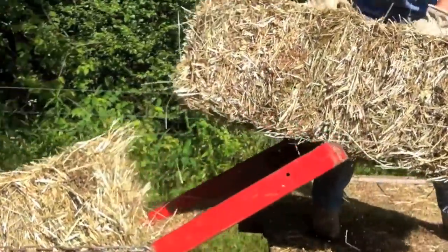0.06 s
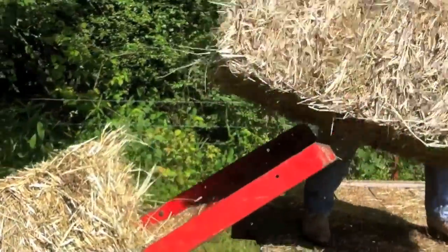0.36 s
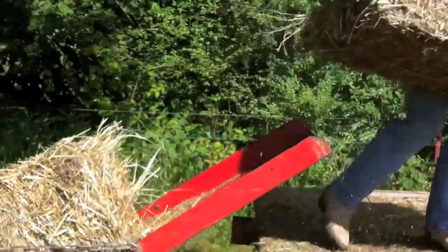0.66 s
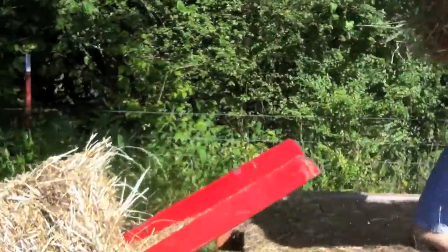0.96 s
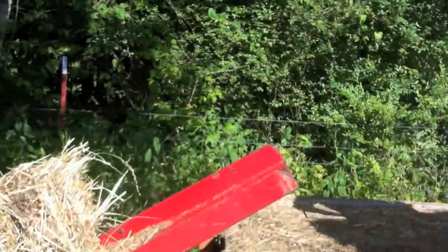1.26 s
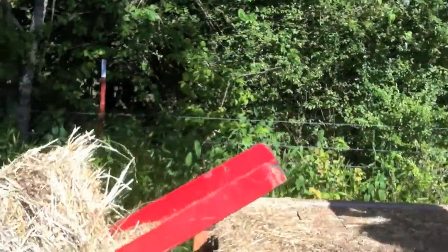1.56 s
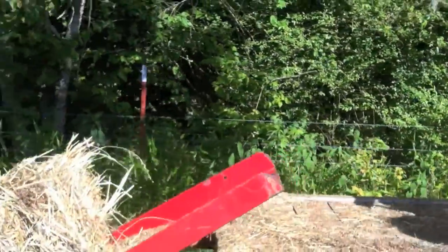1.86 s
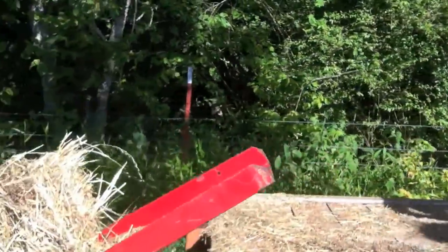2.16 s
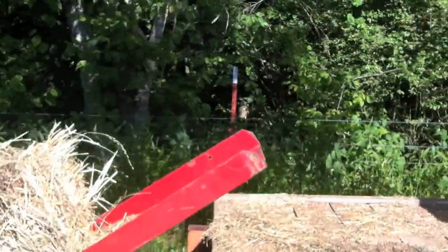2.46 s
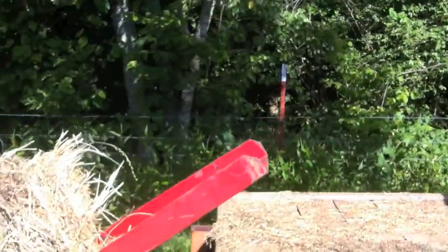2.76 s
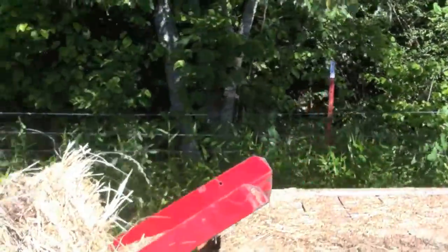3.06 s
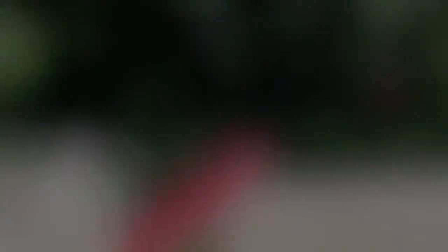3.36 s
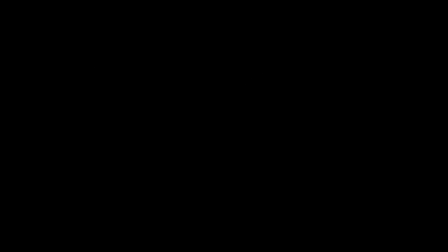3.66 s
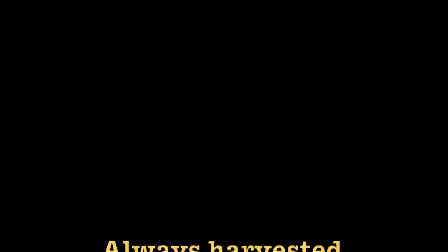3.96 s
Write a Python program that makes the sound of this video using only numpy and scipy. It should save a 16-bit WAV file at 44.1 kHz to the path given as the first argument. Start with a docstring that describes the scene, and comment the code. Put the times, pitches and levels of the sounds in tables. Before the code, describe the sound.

A hay baler rattles close by in an open field, over a tractor's drone. Its plunger crunches into the hay in regular strokes with hard metal clacks and dull wagon thuds, while straw rustles, until everything fades out.

```python
"""Open hay field: a tractor pulls a square baler; one microphone on the wagon, just behind the bale chute.
From the start, chains and sheet metal rattle over the engine's drone while straw rustles in the chute.
At 0.3 s the plunger crunches into the hay with hard clacks, and the wagon deck thuds. Strokes follow about
every 0.65 s, clacking hardest on every second one (1.6 s, 2.9 s); along the way steel squeaks, links clink
and stalks snap. From 3.2 s everything fades, reaching silence at 3.6 s."""
import sys
import numpy as np
from scipy import signal
from scipy.fft import rfft, irfft
from scipy.io import wavfile

SR = 44100
rng = np.random.default_rng(int(sys.argv[2]) if len(sys.argv) > 2 else 0)


def put_to_file(sound):
    """Save the sound as 16-bit audio at rate SR, in the file named by the first command-line argument."""
    columns = np.atleast_2d(sound).T  # one column per channel
    safe = np.clip(columns, -1, 1)
    whole_steps = np.round(safe * 32767)
    wavfile.write(sys.argv[1], SR, whole_steps.astype(np.int16))


N = 176400
T = np.arange(N) / SR


# Surges as the plunger packs hay and it springs back: peak t/s, rise/s, fall/s, clatter/dB, crunch/dB, grind/dB
STROKES = [(.28, 0.015, 0.053, -28.5, -32.5, -33), (.39, 0.01, 0.017, -55, -37.5, -45),
           (.455, 0.04, 0.088, -33.5, -40, -35), (.725, 0.0066, 0.058, -45, -42.5, -33),
           (0.929, 0.017, 0.043, -26.5, -39, -37), (.99, 0.045, 0.083, -28.5, -38.5, -31.5),
           (1.595, 0.015, 0.06, -32, -42, -44), (1.68, 0.017, 0.0091, -29, -36.5, -44),
           (1.775, 0.054, 0.055, -31.5, -35.5, -31.5), (2.265, 0.1, 0.094, -33, -39, -30.5),
           (2.75, 0.063, 0.02, -30.5, -43, -35.5), (2.835, 0.045, 0.037, -28.5, -39, -36.5),
           (2.935, 0.04, 0.04, -32, -36.5, -37.5), (3.068, 0.099, 0.026, -36, -40.5, -36.5)]
def baler():
    """Just ahead of the microphone: a constant rattle; each stroke swells it, crunches hay, grinds steel."""
    clatter_power, crunch_power, grind_power = from_db(-32) ** 2, 0, 0
    for peak, rise, fall, clatter_db, crunch_db, grind_db in STROKES:
        swell = np.exp(-np.where(T < peak, (peak - T) / rise, (T - peak) / fall))
        clatter_power += (from_db(clatter_db) * swell) ** 2
        crunch_power += (from_db(crunch_db) * swell) ** 2
        grind_power += (from_db(grind_db) * swell) ** 2
    flutter = from_db(drift(12))
    metal = rattle(np.sqrt(clatter_power) * flutter) + panels()
    return metal + hay(np.sqrt(crunch_power) * flutter) + grinding(np.sqrt(grind_power))


# Spectrum of rattling chains and sheet metal: f/Hz, level/dB
RATTLE_SPECTRUM = [(100, -35.5), (300, -1.5), (530, -3.5), (700, 0), (1050, -0.5), (1200, -4.5),
                   (1400, -0.5), (1680, 2), (2050, -1.5), (2500, -8), (2850, -9.5), (3400, -11.5),
                   (6500, -23), (15000, -32)]
def rattle(envelope):
    """Chains and panels chatter in thousands of small contacts."""
    return colour(grains(per_s=3200, spread_db=0) * envelope, RATTLE_SPECTRUM)


# Modes of the baler's steel body: f/Hz, level/dB, t60/s
BODY_MODES = [(430, -10.5, 0.065), (656, -4, 0.072), (784, -4.5, 0.096), (961, -0.5, 0.059), (1004, 0, .05),
              (1349, -2, 0.09), (1584, -2.5, 0.16), (1690, -1, 0.07), (1950, -3.5, 0.03),
              (2230, 3.5, 0.081), (2696, -5.5, 0.088), (2804, -2, .06), (5800, -18.5, .03)]
def panels():
    """Random taps keep the steel body ringing."""
    modes = sum(from_db(db) * ring(grains(per_s=300, spread_db=4), hz, t60) for hz, db, t60 in BODY_MODES)
    return from_db(-40) * rms_one(modes)


# Spectrum of crushed hay: f/Hz, level/dB
CRUNCH_SPECTRUM = [(1000, -16.5), (2800, -10.5), (5000, 6.5), (7000, -0.5), (9500, 1), (12000, -14.5),
                   (15500, -16.5)]
def hay(envelope):
    """Stalks crush under the plunger: a dense crunch with sparser crackles."""
    crunch = grains(per_s=6500, spread_db=3.5)
    crackles = from_db(-10.5) * grains(per_s=260, spread_db=2)
    return colour(rms_one(crunch + crackles) * envelope, CRUNCH_SPECTRUM)


# Spectrum of sliding steel: f/Hz, level/dB
GRIND_SPECTRUM = [(900, -28.5), (1350, -4.5), (1650, -0.5), (1950, -3), (2250, -9), (2700, -18),
                  (5000, -30)]
def grinding(envelope):
    """Steel slides on steel with a gritty scrape."""
    return colour(grains(per_s=1500, spread_db=3) * envelope, GRIND_SPECTRUM)


# Blows in the mechanism: t/s, level/dB, edge offset/dB, hollow offset/dB, decay/s, struck part f/Hz
CLACKS = [(0.145, -16, -6, 8, 0.0051, 654), (.263, -11, -8.5, -7.5, .008, 1660),
          (.2705, -8, -17, 0.5, .006, 1390), (.283, -9, -1, -3, 0.0055, 1680),
          (.2865, -10, -15.5, -2, .004, 1550), (.2958, -4, -3, 2, 0.0033, 711),
          (.3, -6, -11, -5, .005, 1070), (.3065, -10.5, -20.5, 5.5, 0.0053, 793),
          (.627, -18.5, -4.5, -12, .006, 2230), (0.92, -19, -2, 3, .01, 1590),
          (.981, -15, -13, -2, 0.0077, 1690), (1.543, -20.5, -2.5, -8, .005, 1560),
          (1.5525, -12, -22, 1, 0.004, 960), (1.5815, -8, -5, 2, 0.004, 1426),
          (1.589, -7.5, -5, 1, 0.006, 1734), (1.596, -14.5, -10.5, 2, 0.014, 403),
          (2.216, -17.5, -2, 6, 0.0091, 1360), (2.752, -16.5, -10, 2.5, 0.0076, 762),
          (2.829, -16, -11.5, 4, .012, 654), (2.8868, -1.5, -2, -8.5, .0032, 1950),
          (2.8922, -6, -17.5, -5.5, .005, 1750), (2.8945, -8, -20, -1, .006, 1020),
          (2.906, -16, -12, 1.5, .014, 842), (3.484, -14.5, 1, -9, .009, 1690)]
# Spectra of a clack's crack, sharp edge and hollow body: f/Hz, level/dB
CRACK_SPECTRUM = [(60, -42.5), (400, -12), (900, -8.5), (1400, 7), (2050, 0), (2450, -9.5), (4000, -28),
                  (12000, -39)]
EDGE_SPECTRUM = [(100, -44), (1000, -16), (2100, 0.5), (3000, 6.5), (3800, -5), (6500, 1.5), (9000, -7.5),
                 (11000, -23), (15000, -28)]
HOLLOW_SPECTRUM = [(30, -42.5), (80, -30.5), (170, -14), (400, 2), (720, 3.5), (1100, -4), (2000, -22),
                   (5000, -49.5)]
def clacks():
    """Steel hits steel: a sharp crack, a shaking tail, a hollow knock; panels and the struck part ring."""
    times, db, edge_db, hollow_db, decay, struck_hz = np.transpose(CLACKS)
    impact = bursts(times, db - 12, decay)
    tail = bursts(times, db - 33, decay_s=.059)
    crack = colour(impact + tail, CRACK_SPECTRUM)
    edge = colour(bursts(times, db + edge_db - 12, decay), EDGE_SPECTRUM)
    knock = strikes(times, -from_db(db + hollow_db + 1))
    hollow = colour(knock + bursts(times, db + hollow_db - 16, decay), HOLLOW_SPECTRUM)
    signs = rng.choice([-1, 1], (len(times), len(BODY_MODES)))
    body = sum(ring(strikes(times, signs[:, k] * from_db(db + mode_db - 26.5)), hz, t60)
               for k, (hz, mode_db, t60) in enumerate(BODY_MODES))
    struck = sum(ring(strikes(at, from_db(level - 14)), hz, t60=.07)
                 for at, level, hz in zip(times, db, struck_hz))
    return crack + edge + hollow + low_cut(body + struck, hz=260)


# Engine harmonics: multiple of the firing rate, level/dB
ENGINE_ORDERS = [(2, -56), (3, -53.5), (4, -48.5), (5, -49)]
# Engine load, heard as the swell of the exhaust: t/s, level/dB
ENGINE_LOAD = [(0, 0), (.65, 0.5), (1.2, -0.5), (1.45, 3), (1.9, 0.5), (2.3, 3.5), (2.55, -4), (2.95, 6.5),
               (3.3, -6.5)]
# Spectrum of the exhaust rumble: f/Hz, level/dB
EXHAUST_SPECTRUM = [(25, -37), (50, -37), (75, -25.5), (105, -6), (135, -1.5), (175, 4), (215, 4),
                    (300, -5.5), (500, -10.5), (1000, -27.5)]
def engine():
    """Farther off, beyond the baler: firing tones over a pulsing exhaust, all chugging unevenly."""
    firing_hz = 47.5 * (1 + .009 * drift(2))
    phase = 2 * np.pi * np.cumsum(firing_hz) / SR
    tones = 0
    for order, db in ENGINE_ORDERS:
        harmonic = np.sin(order * phase + rng.uniform(0, 2 * np.pi))
        tones += from_db(db) * rms_one(harmonic * (1 + .55 * drift(14)))
    puffs = rms_one(rng.standard_normal(N) * (1 + .45 * np.cos(phase)))
    load_db = np.interp(T, *np.transpose(ENGINE_LOAD))
    exhaust = from_db(load_db - 41) * colour(puffs, EXHAUST_SPECTRUM)
    chug = from_db(2 * drift(14))
    return (tones + exhaust) * chug


# Hums of the drive train: f/Hz, level/dB, width/Hz
HUMS = [(133.6, -49, 12), (170.2, -44, 5.1), (269.4, -48.5, 2), (344.3, -54.5, 14), (409, -51.5, 8.4),
        (449, -56, 3.6), (747, -51.5, 10), (1050, -50, 15), (1550, -48, 13), (1714, -44.5, 35),
        (2230, -54.5, 14)]
def drive_train():
    """Shafts and gears hum unsteadily, each in a narrow band of noise."""
    hums = 0
    for hz, db, width in HUMS:
        phase = 2 * np.pi * hz * T
        hums += from_db(db) * rms_one(drift(width) * np.cos(phase) + drift(width) * np.sin(phase))
    return hums


# Thuds on the wagon deck: t/s, level/dB, lowest mode offset/dB
THUDS = [(0.154, -19, -7.5), (0.1712, -30, -6), (.189, -24, -7.5), (.212, -28, -7), (0.33, -19.5, 6.5),
         (0.352, -30, -6), (1.432, -25, 3), (1.745, -26, -8), (2.247, -27.5, -8), (2.336, -27, 9),
         (2.89, -21, 11), (2.923, -28.5, 10.5), (2.972, -32, 0)]
# Modes of the boards: f/Hz, level/dB, t60/s
DECK_MODES = [(120, -11, 0.13), (166.6, -1.5, 0.11), (241, -8.5, 0.2)]
# Faint deep bumps: t/s, level/dB
BUMPS = [(.335, -56), (2.212, -55), (2.885, -48)]
BUMP_SPECTRUM = [(12, -2.5), (50, -6.5), (100, -7.5), (300, -36)]  # f/Hz, level/dB
def deck():
    """Under the microphone, soft heavy blows boom in the wagon's boards, with a few deep bumps."""
    times, db, lowest_db = np.transpose(THUDS)
    boom = 0
    for k, (hz, mode_db, t60) in enumerate(DECK_MODES):
        blows = strikes(times, from_db(db + mode_db + lowest_db * (k == 0)))
        boom += (-1) ** k * ring(blows, hz, t60)
    bumps = colour(bursts(*np.transpose(BUMPS), decay_s=.025), BUMP_SPECTRUM)
    return low_cut(boom, hz=80) + bumps


# Course of the rustle, and single stalks snapping: t/s, level/dB
RUSTLE_LEVEL = [(0, -43.5), (.85, -45.5), (1.15, -45), (1.45, -42), (2.05, -42), (2.55, -41), (3.05, -41),
                (3.5, -42.5)]
SNAPS = [(.451, -29), (1.324, -29), (1.677, -34), (1.768, -33), (2.161, -22.5), (2.2135, -18),
         (2.481, -32.5), (2.938, -29.5)]
# Their spectra: f/Hz, level/dB
RUSTLE_SPECTRUM = [(2000, -14.5), (4500, -6), (7000, -1.5), (10000, 2.5), (12000, -0.5), (15500, -4)]
SNAP_SPECTRUM = [(2000, -26.5), (7000, -0.5), (10000, 7), (12500, 5), (15500, -5.5)]
def straw():
    """Close by, dry stalks rustle along the chute, and a few snap."""
    level = from_db(np.interp(T, *np.transpose(RUSTLE_LEVEL)) + 1.04 * drift(29))
    rustle = colour(level * grains(per_s=11000, spread_db=1.5), RUSTLE_SPECTRUM)
    snaps = colour(bursts(*np.transpose(SNAPS), decay_s=.0013), SNAP_SPECTRUM)
    return rustle + snaps


# Clinks of the chain: t/s, level/dB
CLINKS = [(.388, -47), (2.138, -39), (2.228, -42), (2.264, -34), (2.937, -35), (3.011, -37), (3.058, -40),
          (3.094, -42)]
# Modes of a link: f/Hz, level/dB, t60/s
LINK_MODES = [(4370, 0, .014), (5130, 3, .018), (5530, -1, .016), (6350, -17, .014), (7250, -2, 0.017),
              (8240, -11.5, .012)]
def chain():
    """Slack links jostle and ring briefly."""
    jostle = bursts(*np.transpose(CLINKS), decay_s=.01)
    link = sum(from_db(db - 60 * T / t60) * np.sin(2 * np.pi * hz * T) for hz, db, t60 in LINK_MODES)
    return signal.fftconvolve(jostle, link / np.linalg.norm(link))[:N]


# Squeaks of the metal: peak t/s, f/Hz, level/dB, half length/s
SQUEAKS = [(0.32, 7750, -39, 0.013), (1.55, 6700, -35, 0.0077), (1.607, 7760, -41.5, .009),
           (1.64, 7700, -45, .012), (2.4, 3500, -33, 0.0045), (2.42, 3540, -42, .005)]
def squeaks():
    """Rubbing steel gives brief, rough whistles of wavering pitch."""
    wavering_time = np.cumsum(1 + .0075 * drift(250)) / SR
    whistles = 0
    for peak, hz, db, half_length in SQUEAKS:
        envelope = from_db(db) * np.exp(-.5 * ((T - peak) / half_length) ** 2)
        whistles += envelope * np.sin(2 * np.pi * hz * wavering_time)
    return whistles * (1 + .42 * drift(300))


def reflections(direct):
    """Weak echoes off the baler's sides and the wagon reach the microphone 2-20 ms late: a hollow colour."""
    lags = (rng.uniform(.002, .02, 12) * SR).astype(int)
    echoes = sum(np.pad(direct, (lag, 0))[:N] * (-1) ** k for k, lag in enumerate(lags))
    return direct + from_db(-15) * echoes / np.sqrt(len(lags))


def from_db(db):
    """Decibels to gain."""
    return 10 ** (np.asarray(db) / 20)


def rms_one(x):
    """Scale to unit rms."""
    return x / np.sqrt(np.mean(x ** 2) + 1e-20)


def colour(x, spectrum):
    """Causal (minimum-phase) filter with the given spectral shape and unit power gain."""
    hz, db = np.transpose(spectrum)
    f = np.maximum(np.fft.rfftfreq(2 * N, 1 / SR), 1)
    gain = rms_one(from_db(np.interp(np.log(f), np.log(hz), db)))
    cepstrum = irfft(np.log(gain))
    cepstrum[1:N] *= 2
    cepstrum[N + 1:] = 0
    return irfft(rfft(x, 2 * N) * np.exp(rfft(cepstrum)))[:N]


def low_cut(x, hz):
    """Second-order high-pass."""
    return signal.sosfilt(signal.butter(2, hz, "high", fs=SR, output="sos"), x)


def drift(hz):
    """Random wavering, mostly slower than hz; rms 1."""
    f = np.fft.rfftfreq(N, 1 / SR)
    return rms_one(irfft(rfft(rng.standard_normal(N)) / (1 + (f / hz) ** 2), N))


def grains(per_s, spread_db):
    """Random tiny contacts, their sizes scattered by spread_db; rms 1."""
    sizes = from_db(spread_db * np.minimum(rng.exponential(1, N), 5))
    return rms_one(sizes * rng.choice([-1, 1], N) * (rng.random(N) < per_s / SR))


def ring(clicks, hz, t60):
    """A unit click sets a dying sine of height 1 ringing."""
    radius, angle = np.exp(-np.log(1000) / (t60 * SR)), 2 * np.pi * hz / SR
    return signal.lfilter([0, np.sin(angle)], [1, -2 * radius * np.cos(angle), radius ** 2], clicks + 1e-18)


def strikes(times, gains):
    """One impulse for each blow."""
    out = np.zeros(N)
    np.add.at(out, np.clip((times * SR).astype(int), 0, N - 1), gains)
    return out


def bursts(times, db, decay_s):
    """A quickly dying spray of contacts for each blow."""
    power = np.zeros(N)
    for start, level, decay in np.broadcast(times, db, decay_s):
        live = slice(*np.searchsorted(T, [start, start + 10 * decay]))
        power[live] += (from_db(level) * np.exp((start - T[live]) / decay)) ** 2
    return np.sqrt(power) * rng.standard_normal(N)


def scene():
    """Open air at the microphone on the wagon, the same in both channels."""
    mono = engine() + drive_train() + reflections(baler() + straw())
    mono += clacks() + chain() + deck() + squeaks()
    return np.array([mono, mono])


def record(dry):
    """A straight fade to silence and a steep cut of the top treble."""
    fade_start_s, fade_end_s, cutoff_hz = 3.17, 3.598, 15800
    fade = np.clip((fade_end_s - T) / (fade_end_s - fade_start_s), 0, 1)
    return signal.sosfilt(signal.ellip(12, .1, 90, cutoff_hz, fs=SR, output="sos"), dry * fade)


dry = scene()
out = record(dry)
put_to_file(out)
```